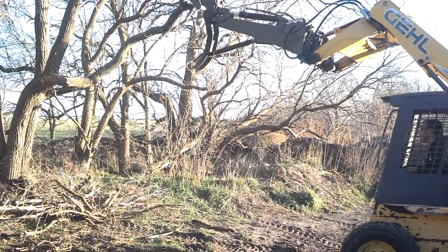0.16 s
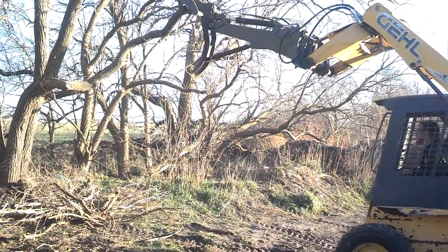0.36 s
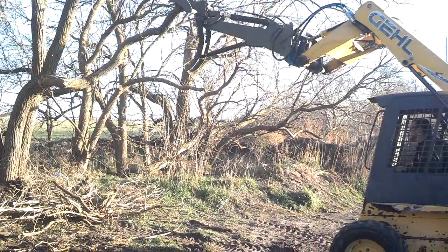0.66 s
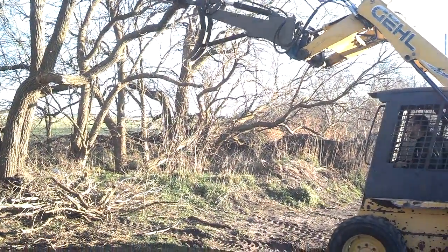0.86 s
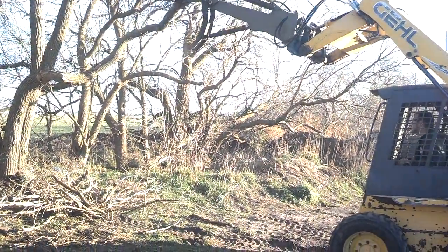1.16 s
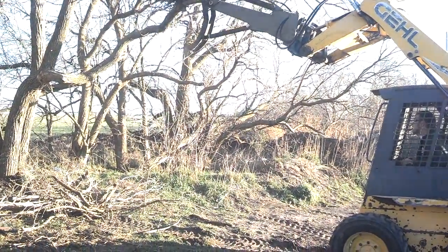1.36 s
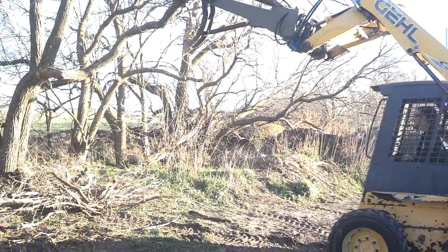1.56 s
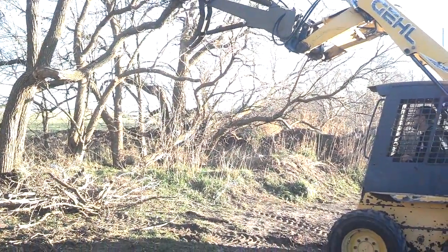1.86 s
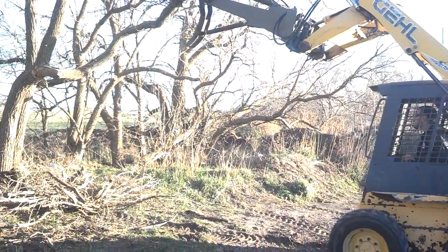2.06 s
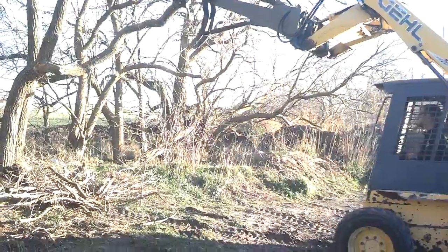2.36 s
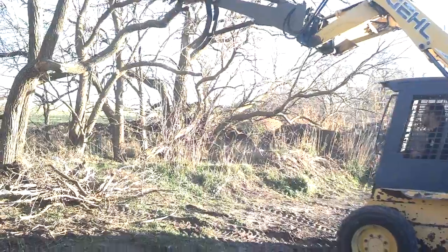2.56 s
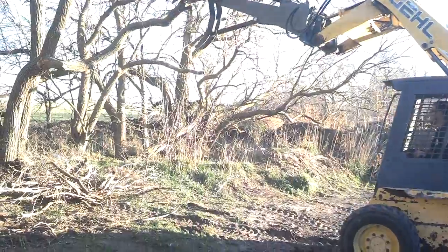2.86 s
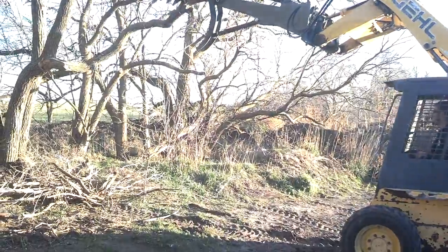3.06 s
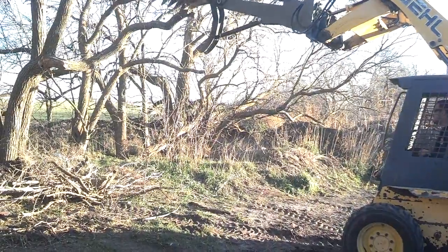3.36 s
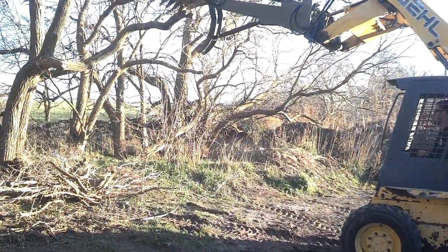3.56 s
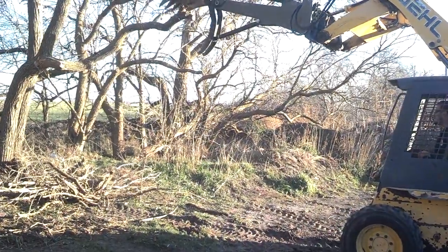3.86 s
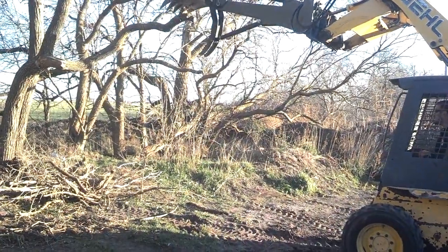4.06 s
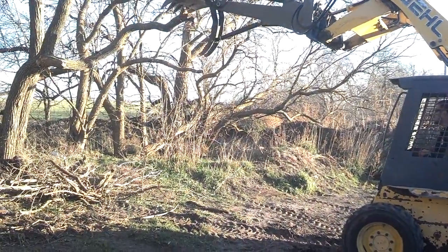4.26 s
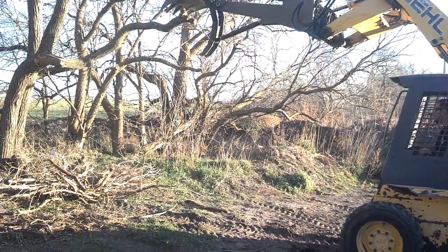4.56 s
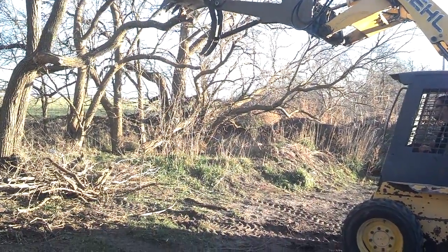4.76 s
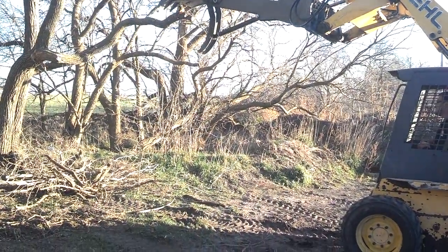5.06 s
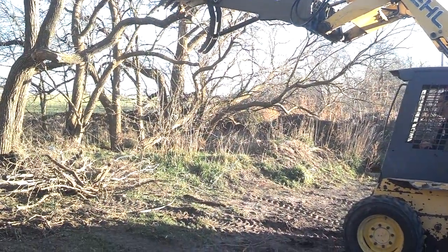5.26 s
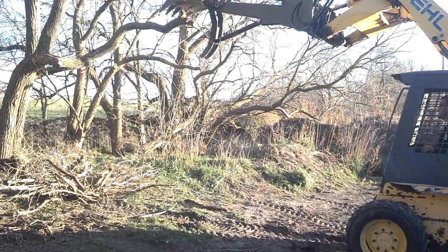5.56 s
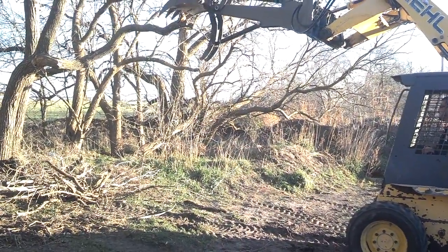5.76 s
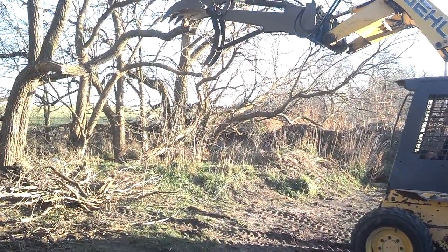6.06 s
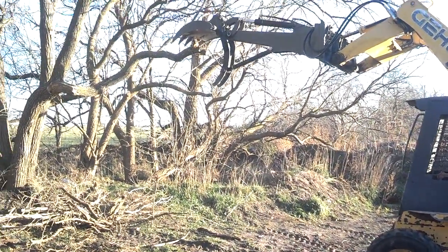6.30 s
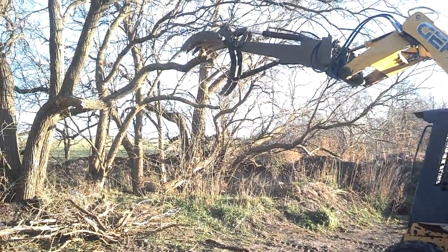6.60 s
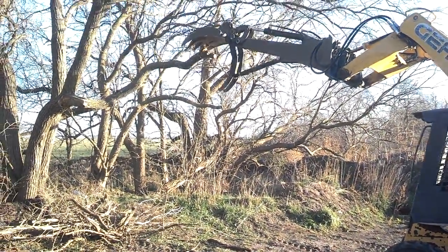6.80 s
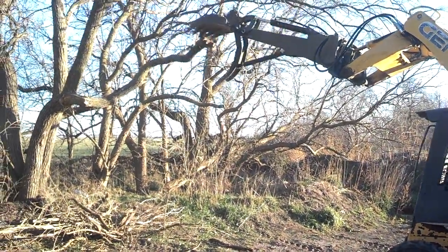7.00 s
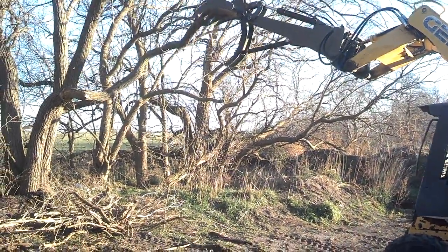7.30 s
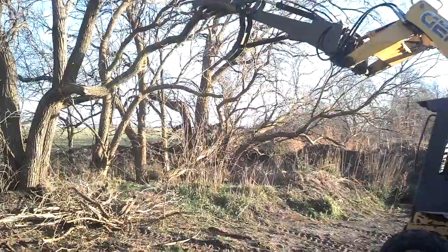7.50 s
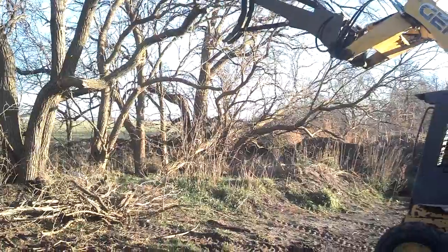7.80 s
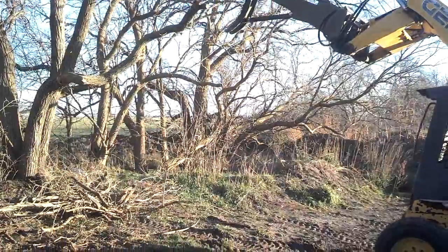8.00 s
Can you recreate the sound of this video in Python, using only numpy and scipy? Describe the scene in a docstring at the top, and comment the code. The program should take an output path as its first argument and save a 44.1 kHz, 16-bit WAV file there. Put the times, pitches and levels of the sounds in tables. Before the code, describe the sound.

A steady, rattly diesel engine with fan rush and valve ticking fills a nearby open-air stereo pickup, wind thumping low on the microphone. Early pump whine and metal knocks lead to clusters of sharp branch snaps, each splintering and stuttering, with fine twig crackle between. The engine dips under the loudest cracks and slowly recovers; a late clatter of steel and a rising whine close it.

```python
"""A diesel loader runs from start to end as firing tones, rushing noise and ringing panels, with wind beside it.
The wind is a low rumble with puffs of a few swings; pump whines geared to the engine soon come and go.
From 0.7 s steel pins knock as decaying modes; from 1.1 s dead brush snaps as bursts of noise, with twigs crackling.
A two-port microphone forms left and right by subtracting each port, delayed, from the other."""
import sys
import numpy as np
from scipy import signal
from scipy.fft import rfft, irfft
from scipy.io import wavfile
from scipy.ndimage import uniform_filter1d, map_coordinates

SR = 44100
rng = np.random.default_rng(int(sys.argv[2]) if len(sys.argv) > 2 else 0)


def inscribe(sig):
    """Save sig as 16-bit PCM at rate SR to the path in sys.argv[1].

    A 1-D sig is mono; a 2-D sig holds one channel per row.
    Samples are clipped to [-1, 1] before scaling.
    """
    pcm = np.round(np.clip(np.atleast_2d(sig).T, -1, 1) * 32767)
    wavfile.write(sys.argv[1], SR, pcm.astype(np.int16))


N = 358974
T = np.arange(N) / SR  # time of each sample in seconds


def gain_of(db):
    """Turns decibels into a plain multiplier."""
    return 10 ** (np.asarray(db) / 20)


def evened(x):
    """Scales x to an rms of 1."""
    return x / np.sqrt(np.mean(x ** 2) + 1e-20)


def curve(rows):
    """Joins (seconds, value) rows by straight lines over the whole scene."""
    times, values = np.transpose(rows)
    return np.interp(T, times, values)


def read(points, hz, column=1):
    """Reads a table column at any pitch, joining its points along a logarithmic pitch scale."""
    points = np.transpose(points)
    return np.interp(np.log(hz + 1), np.log(points[0] + 1), points[column])


def colour(x, points):
    """Weights the spectrum of x by a table of (Hz, dB)."""
    hz = np.fft.rfftfreq(len(x), 1 / SR)
    return irfft(rfft(x) * gain_of(read(points, hz)), len(x))


def drift(per_s):
    """Smooth random wandering of rms 1, with so many random points a second."""
    knots = np.arange(-2, N / SR * per_s + 3)
    return evened(map_coordinates(rng.standard_normal(len(knots)), [T * per_s + 2], order=3))


def ring(x, hz, width_hz):
    """One resonance with a gain of 1 at its peak."""
    return signal.lfilter(*signal.iirpeak(hz, hz / width_hz, SR), x)


def add(mix, start_s, sound):
    """Mixes a sound in at its start time, cut off at the end of the scene."""
    part = mix[round(start_s * SR):][:len(sound)]
    part += sound[:len(part)]


def span(start, end, edge_s):
    """1 between start and end, with soft edges."""
    return np.clip(np.minimum(T - start, end - T) / edge_s, 0, 1)


# Moments when engine and wind drop in level. Each row: time in seconds, depth in dB.
LEVEL_STEPS = [(.85, 3), (1.794, 5.5), (2.05, 4.5), (2.59, 13), (3.16, 11), (3.41, 13), (3.98, 13.5),
               (4.475, 13.5), (4.91, 10), (7.12, 4)]
CREEP_DB_PER_S, HOLD_S = 7, 0.59  # slow return at first, for this long
EXTRA_RETURN_DB_PER_S = 5  # added to the creep after the hold
SWELL_DB, SWELL_S = 4, 0.056  # the sound also swells up at the very start


def dip_db():
    """How far engine and wind are held below full level: quick drops that recover slowly, then faster."""
    times, depths = np.transpose(LEVEL_STEPS)[:, :, None]
    since = T - times
    late = np.maximum(since - HOLD_S, 0)
    left = depths - CREEP_DB_PER_S * since - EXTRA_RETURN_DB_PER_S * late
    deepest = np.maximum(left * (since > 0), 0).max(0)
    return uniform_filter1d(deepest, size=900) + SWELL_DB * np.exp(-T / SWELL_S)


# How fast the crankshaft spins. Each row: time in seconds, speed in turns a second.
CRANK_SPEED = [(0.0, 29.96), (0.55, 29.7), (0.9, 28.94), (1.1, 29.26), (1.33, 29.05), (1.65, 30.0),
               (1.95, 29.75), (2.3, 29.7), (2.6, 29.2), (2.9, 30.2), (3.08, 29.9), (3.32, 28.9),
               (3.7, 30.2), (4.1, 29.25), (4.33, 29.8), (4.65, 29.25), (4.9, 30.0), (6.5, 29.98),
               (6.75, 29.15), (6.92, 29.1), (7.1, 28.7), (7.48, 29.55), (7.9, 28.7), (8.14, 29.3)]


def crank_turns():
    """Turns made by the crankshaft: its speed added up over time."""
    return np.cumsum(curve(CRANK_SPEED)) / SR


# Exhaust tones. Each row: multiple of the crankshaft speed, level in dB against the other engine tones,
# dB gained for each turn a second that load pulls the speed down.
EXHAUST_TONES = [(2.0, -31.5, 0), (2.5, -52, -2), (4.0, -12.5, -0.5), (4.5, -66, 2), (5.5, -26, -7),
                 (6.0, -22, 7.5), (6.5, -28.5, 2), (7.0, -31, -3), (7.5, -43, 4), (8.0, -33, -10.5),
                 (8.5, -37.5, -14), (9.0, -40.5, -4), (9.5, -36.5, 6.5), (10.0, -32, 3.5), (10.5, -55, 10),
                 (11.0, -32.5, -6), (11.5, -36, 1), (12.0, -30, -6.5), (12.5, -33.5, 5), (13.0, -36, 1.5),
                 (14.0, -55, 5), (15.0, -53, 4), (16.0, -59, -1), (16.5, -42.5, -2), (17.0, -40, 3),
                 (17.5, -46, 4), (18.0, -40.5, -1.5), (18.5, -41.5, 4), (19.0, -42, -3), (19.5, -68, -7),
                 (20.0, -39, -4)]
# Where groups of tones peak in the cycle. Each row: highest multiple in the group, lateness in turns.
CHUG_LAG = [(7, 0), (10, 1.3), (15, .55), (20, 1.35)]


def exhaust_tones(turns, sag):
    """Tones locked to the crankshaft; each group peaks together, so the exhaust chugs once in two turns."""
    tones = np.zeros(N)
    for multiple, db, load_db in EXHAUST_TONES:
        late = next(lag for top, lag in CHUG_LAG if multiple <= top)
        # higher tones wander more, in strength and in phase
        strength_db = db + load_db * sag + 2.6 * (multiple > 4) * drift(8)
        cycles = multiple * (turns - late) + .003 * multiple * drift(5)
        tones += gain_of(strength_db) * np.cos(2 * np.pi * cycles)
    return tones


# Thin tones of gears and valves. Each row: multiple of the crankshaft speed, level in dB against the other
# engine tones, dB gained for each turn a second that load pulls the speed down.
GEAR_TONES = [(21.2, -42.5, -1), (24, -56, -9), (23.9, -56, -9), (26, -45.5, -23), (27, -46, -4),
              (37.8, -52, 2), (38.15, -46, -4), (40.6, -47.5, -15), (47.1, -46, -11), (49.7, -46.5, 1.5),
              (54.3, -45, -4), (60.8, -78, -17)]


def gear_tones(turns, sag):
    """Thin, slightly wavering tones geared to the crankshaft, each with its own random phase."""
    tones = np.zeros(N)
    for multiple, db, load_db in GEAR_TONES:
        strength_db = db + load_db * sag + 2.5 * drift(3)
        cycles = multiple * turns + .04 * drift(5) + rng.random()
        tones += gain_of(strength_db) * np.cos(2 * np.pi * cycles)
    return tones


# Colour of the valve gear's ticks. Each row: pitch in Hz, relative level in dB.
TAPPET_COLOUR = [(800, -30), (1800, -9), (4000, 4), (7000, -1), (12000, -26), (16000, 9.5)]
TAPPET_T60_S = 0.017  # time to fade by 60 dB


def tappets(firings):
    """Valve gear ticks at each firing: short fading noise, uneven in time and strength."""
    ticks = np.diff(np.floor(firings + .02 * drift(30)), prepend=0) * gain_of(4 * drift(60))
    fades = signal.oaconvolve(ticks, gain_of(-60 * T[:2000] / TAPPET_T60_S))[:N]
    return evened(colour(fades * rng.standard_normal(N), TAPPET_COLOUR))


# Rushing of fan, intake and block. Each row: pitch in Hz, relative level in dB per Hz.
RUSH_COLOUR = [(30, -49), (60, -44), (120, -38), (250, -40), (430, -52), (600, -53), (1000, -58),
               (1500, -67.5), (2000, -67), (2800, -64), (4100, -70), (6500, -74.5), (8500, -85.5),
               (9800, -85), (11000, -99.5), (13000, -76), (15600, -83)]
# Panels and castings that ring with the clatter. Each row: pitch in Hz, width in Hz, relative level in dB.
PANELS = [(819, 24, 3), (1150, 72, -3.5), (1501, 50, 3.5), (1622, 75, 0), (2300, 160, -7), (4036, 100, -3)]
# Strength of each of the four firings in turn, in dB.
CYLINDER_DB = [-0.5, -12, 1.5, -11.5]
START_TURNS = .88  # where the crankshaft stands at the start
REPEAT_SHARE = .55  # part of the clatter that returns alike every two turns
REPEAT_SLIP_TURNS = .003  # typical slip of that repeat
ENGINE_DB = -33.5  # overall engine level


def engine():
    """Tones, ticks, rushing that throbs and panels struck by each of four firings in two turns.
    The second row is the part of the rushing that arrives scattered, unlike at the two ports."""
    turns = START_TURNS + crank_turns()
    sag = 29.7 - curve(CRANK_SPEED)  # load pulls the speed down
    tones = exhaust_tones(turns, sag) + gear_tones(turns, sag)

    firings = 2 * turns
    strength = gain_of(np.take(CYLINDER_DB, firings.astype(int) % 4))
    pulses = uniform_filter1d(strength * np.exp(-(firings % 1) / 0.5), size=60)
    throb = (2.8 + pulses) * gain_of(.7 * drift(12))
    fresh, scattered = throb * rng.standard_normal((2, N))

    # one stored stretch of noise is read again on every two turns
    cycle = rng.standard_normal(3000)
    place = (turns + REPEAT_SLIP_TURNS * drift(20)) / 2 % 1
    repeated = throb * cycle[(place * len(cycle)).astype(int)]
    drive = np.sqrt(1 - REPEAT_SHARE ** 2) * fresh + REPEAT_SHARE * repeated
    rush = evened(colour(drive, RUSH_COLOUR))

    blows = strength * np.diff(np.floor(firings), prepend=0) * gain_of(2 * drift(47))
    struck = evened(drive) + 0.33 * evened(blows)
    panels = evened(sum(gain_of(db) * evened(ring(struck, hz, width)) for hz, width, db in PANELS))

    direct = gain_of(31.5) * tones + gain_of(11.5) * rush
    direct += gain_of(-8) * panels + gain_of(-10) * tappets(firings)
    scattered_rush = gain_of(7.5) * evened(colour(scattered, RUSH_COLOUR))
    return gain_of(ENGINE_DB - dip_db()) * np.array([direct, scattered_rush])


# Strength of the wind. Each row: time in seconds, rumble level in dB before the dips.
GUST = [(0, -27), (.25, -28), (.55, -37), (.85, -24), (1.1, -29), (1.4, -32), (1.6, -36), (2.0, -31),
        (2.7, -31), (3.0, -26), (3.3, -30), (4.35, -34), (4.8, -23), (5.2, -33), (6.2, -34), (6.6, -36),
        (7.4, -33), (8.14, -40)]
# Colour of the rumble. Each row: pitch in Hz, relative level in dB per Hz.
RUMBLE_COLOUR = [(20, -31), (45, -20), (110, 2.5), (200, -11), (330, -21), (600, -18.5), (1200, -52)]
# Puffs at set times. Each row: time of the middle in seconds, peak level in dB.
SET_PUFFS = [(.073, -21), (.096, -17), (.206, -16), (.263, -24), (.514, -19), (.841, -7), (.86, -9),
             (.898, -10), (.935, -11), (.956, -14), (1.285, -11), (1.44, -15), (1.73, -11), (1.758, -9),
             (1.795, -9), (2.043, -8), (2.937, -15), (3.003, -17), (3.06, -15), (4.623, -28), (4.661, -21),
             (4.863, -17), (5.14, -20), (5.172, -21), (5.398, -14), (5.538, -15), (5.785, -14),
             (5.861, -14), (5.933, -17), (6.225, -19), (7.449, -16)]
PUFF_HZ, PUFF_SPREAD = 158, 0.31  # middle pitch, and the share by which it varies either way
RANDOM_PUFFS_PER_S, RANDOM_PUFF_DB = 9, 13.5  # further puffs fall at random, about this far above the rumble


def wind():
    """Lumpy low noise, and puffs of two or three low swings that slow down as they pass."""
    rumble_db = curve(GUST) - dip_db()
    noise = evened(colour(rng.standard_normal(N), RUMBLE_COLOUR))
    out = gain_of(rumble_db + 1.7 * drift(28)) * noise

    at = 1300 + np.flatnonzero(rng.random(N - 1300) < RANDOM_PUFFS_PER_S / SR)
    random_db = rumble_db[at] + RANDOM_PUFF_DB + 2.1 * rng.standard_normal(len(at))
    random_puffs = np.transpose([T[at], random_db])

    t = T[:2600] - T[1300]  # seconds from the middle of a puff
    for middle_s, db in [*SET_PUFFS, *random_puffs]:
        pitch, phase = rng.random(2)
        hz = PUFF_HZ * (1 + PUFF_SPREAD * (2 * pitch - 1))
        swing = np.cos(2 * np.pi * (hz * t - 900 * t ** 2 + phase))
        swell = np.exp(-(t * hz / 0.47) ** 2)
        add(out, middle_s - T[1300], gain_of(db) * swell * swing)
    return out


# Whines of the two pumps while loaded. Each row: start in seconds, end in seconds,
# multiple of the crankshaft speed, level in dB reached at the end (before the partials' own levels).
DRIVE_PUMP = [(.09, .22, 18, -37), (.17, .86, 18, -23), (.83, .97, 18, -32), (7.25, 7.45, 18, -42),
              (8.02, 8.3, 18, -24)]
LIFT_PUMP = [(.7, 1.03, 26, -31), (1.06, 1.42, 26, -29), (.68, 1.06, 27, -36), (2.33, 2.62, 26, -33.5),
             (3.04, 3.43, 26, -41), (3.86, 4.2, 26, -44.5), (4.2, 4.7, 26, -48), (6.74, 6.97, 26, -34),
             (7.6, 8.05, 30, -45), (7.78, 8.08, 41.5, -42), (7.98, 8.06, 27, -29), (8.04, 8.3, 27, -26)]
LOAD_S = .05  # the pressure comes and goes this fast
FLUTTER_DB, FLUTTER_PER_S = 2, 35  # pressure ripple roughens the whine


def pump_whine(stretches, partials, build_db):
    """A slightly unsteady tone, geared to the crankshaft, that sounds only while the pump is loaded."""
    out, crank = np.zeros(N), crank_turns()
    for start, end, multiple, level_db in stretches:
        turns = multiple * crank + 0.0062 * drift(4.2)
        tone = sum(gain_of(db) * np.sin(2 * np.pi * k * turns) for k, db in partials)
        # pressure builds through the stretch
        rise_db = build_db * np.clip((T - end) / (end - start), -1, 0)
        unsteady_db = 0.4 * drift(6.9) + FLUTTER_DB * drift(FLUTTER_PER_S)
        out += span(start, end, LOAD_S) * gain_of(level_db + rise_db + unsteady_db) * tone
    return out


def pumps():
    """Both pumps; each partial is given as its multiple of the whine's pitch and its level in dB."""
    driving = pump_whine(DRIVE_PUMP, [(1, 2.5), (2, -26)], build_db=6.5)
    lifting = pump_whine(LIFT_PUMP, [(.5, -0.21), (1, -0.15)], build_db=1.5)
    return driving + lifting


# Steel on steel. Each row: start in seconds, peak level in dB, pitch in Hz around which the struck spot
# rings most, share of the free ring time.
KNOCKS = [(.675, -15, 1200, 0.71), (.682, -19, 1500, .6), (0.695, -27, 1398, .5), (1.004, -22.5, 2200, .6),
          (1.008, -33, 696, 0.45), (1.055, -13.5, 614, .2), (1.096, -21, 1000, 0.6), (3.5, -27, 1500, .5),
          (3.521, -26, 1520, 0.65), (7.093, -21, 1150, 0.6), (7.101, -24, 1250, .5),
          (7.108, -15, 1080, 0.46), (7.11, -18, 756, 1.5), (7.113, -18, 2360, 1.1), (7.115, -20, 1500, .9),
          (7.129, -19, 800, 0.73), (7.158, -17.5, 740, .4), (7.243, -24, 1200, 0.37),
          (7.248, -24, 1720, .5), (7.272, -26, 1150, 0.36)]
# Ringing modes of the arm. Each row: pitch in Hz, relative level in dB, seconds to fade by 60 dB when free.
STEEL_MODES = [(534, -6, 0.14), (756, 4, 0.16), (810, -18, 0.12), (1030, -24, 0.28), (1090, -8.5, 0.1),
               (1280, -3, 0.15), (1410, -18, 0.055), (1500, -17, 0.26), (1600, -7, 0.19), (1700, -10, 0.11),
               (2080, -10, 0.087), (2480, -4, 0.17), (3270, -4, 0.11)]
CLACK_DB, CLACK_T60_S, CLACK_DB_PER_OCTAVE = -4, .04, 8  # dull, wide start; the slope grows as octaves squared
RATTLE_DB = 3  # loose pins chatter through the ring


def linkage():
    """Slack pins knock: a dull clack, then the same arm rings, most strongly near the struck spot's pitch."""
    out, t = np.zeros(N), T[:12000]
    for start_s, db, spot_hz, free in KNOCKS:
        tone = np.zeros(len(t))
        for hz, mode_db, t60 in STEEL_MODES:
            octaves_away = abs(np.log2(hz / spot_hz))
            fade = gain_of(mode_db - 12 * octaves_away - 60 * t / (free * t60))
            tone += fade * np.sin(2 * np.pi * (hz * t + rng.random()))
        chatter, noise = rng.standard_normal((2, len(t)))
        tone *= gain_of(RATTLE_DB * evened(uniform_filter1d(chatter, size=150)))

        spot = [(spot_hz * 2. ** k, -CLACK_DB_PER_OCTAVE * k ** 2) for k in (-3, -2, -1, 0, 1, 2, 3)]
        clack = colour(noise, spot) * gain_of(-60 * t / CLACK_T60_S)
        blow = tone / abs(tone).max() + gain_of(CLACK_DB) * clack / abs(clack).max()
        attack = np.minimum(t / 0.0018, 1)
        add(out, start_s, gain_of(db) * blow / abs(blow).max() * attack)
    return out


# Branches snapping. Each row: start in seconds, level of the main part in dB, then against that level the treble
# in dB, the knock in dB and the splintering in dB (before the trim below), its fade by 60 dB in seconds.
SNAPS = [(1.094, -27.5, 0, -6, 11, 0.19), (1.3195, -25, 2, -15, -22, .08), (1.7227, -40, -12, -13, -11, .1),
         (2.4282, -20, -11, 7.5, -6, .1), (2.4418, -32, -4, -5, 15.5, 0.11),
         (2.528, -28, 13, -12, -11, .08), (2.547, -37, 10, -13, -7, .06), (2.559, -17, -16, -26, -14, .06),
         (2.577, -20, -8, -22, 2, 0.078), (2.588, -5.5, -32, -9.5, -15.5, 0.12),
         (2.605, -21.5, -8, -10, 1, 0.088), (2.746, -24.5, -7, -17, -2, 0.12),
         (2.8289, -27.5, -9, -10, -2, 0.11), (3.1193, -33.5, 12.5, -16, -7, 0.082),
         (3.158, -13, -14, -13, -5.5, 0.12), (3.198, -32, 1, -19, -8, 0.073),
         (3.2009, -20.5, 2, -19, 2.5, 0.14), (3.237, -30, 9, -22, -6, 0.038),
         (3.268, -35, 12, -16, -1, .06), (3.278, -19, 3, -15, 1, 0.17), (3.3023, -22, 7, 0.5, -7, 0.055),
         (3.331, -27.5, -4, -13, 8, 0.11), (3.374, -22, -2.5, -16, -6, 0.083),
         (3.41, -13.5, -14, -20, 0.5, 0.092), (3.4454, -30, -7, -9, 8, 0.21),
         (3.476, -25.5, -9, 9, -12, 0.12), (3.93, -27.5, 2, -13, -17, 0.065), (3.973, -23, 6, -14, -8, .06),
         (3.979, -12, -6, -7.5, -10, 0.19), (4.0131, -17, 3, -12, -11.5, 0.11),
         (4.0716, -31, 5, -12, -13, 0.07), (4.1253, -35.5, 8, -11, 2, 0.18),
         (4.455, -34, 8, -16, -6, 0.075), (4.465, -32, 6, -16, -12, .05), (4.4745, -15, 0, -20, -8, 0.09),
         (4.483, -24, -6, 2, -6, 0.06), (4.629, -31, 2, -13, -7, .06), (4.7327, -35, -8, -15, -4, .06),
         (4.7764, -37, 13, -13, -19, .06), (4.8354, -25, 3, -18, -14, .07),
         (4.9089, -20, 0, -21, -11, 0.063), (4.938, -27, -2, -14, -4, 0.08),
         (5.0358, -23, 2, -18, -14, 0.08), (5.122, -41.5, 20, -13, -10, .06),
         (5.165, -36, 10, -13.5, -11, .05), (5.2467, -31, -1, -13, -2, .08),
         (5.391, -22.5, -10, 1, -5, 0.11), (5.6107, -25, -19, 3, -4, 0.13),
         (5.6856, -23, -2, -11, -5, 0.086), (5.975, -35, 13, -12, -12, .05), (6.034, -33, 15, -13, -8, .05),
         (6.049, -27, 10.5, -13, -2, 0.071), (6.3418, -19, 2.5, -12, -11, 0.087),
         (7.114, -29, 4.5, 5, 6, 0.5), (7.1625, -26, 1, -13, 0, 0.092)]
# Repeats of the tick at fixed delays after each snap. Each row: delay in seconds, level in dB against the
# splintering, which counts as -7 dB at most.
STUTTER = [(.0043, 5), (.0088, 3), (.0128, 0), (.019, -4)]
BREAK_DB = 8  # the first break of the fibres against the tick's noise
GRAIN_DB = 4  # each branch has its own uneven colour
SNAP_DRY_DB = 5  # the hiss of splinters is turned down this much
TREBLE_T60_SHARE = .55  # treble dies sooner than the rest
# bands of a snap: (Hz, dB)
MAIN_BAND = [(300, -26), (900, -1.0), (2200, -4.0), (2800, 0.5), (5200, -1.5), (7000, -14.5), (16000, -25.5)]
TREBLE_BAND = [(4500, -14), (6500, -5.0), (9000, -5.5), (11000, -33), (15500, 0)]
KNOCK_BAND = [(250, -32), (500, -7.0), (800, -1.0), (1600, -4.0), (2300, -16.5)]


def snaps():
    """Each snap is a sharp tick heard again a few times within milliseconds, splintering noise, and a duller
    knock."""
    out, t = np.zeros(N), T[:8192]
    tick = gain_of(-60 * t / .006) * np.minimum(t / .0006, 1)
    first_break = gain_of(BREAK_DB) * (t == T[20])
    for start_s, db, treble_db, knock_db, splinter_db, t60 in SNAPS:
        noise, grains = rng.standard_normal((2, len(t)))
        branch = np.transpose([np.geomspace(500, 16000, 30), GRAIN_DB * rng.standard_normal(30)])
        branch_noise = colour(noise, branch)
        fibres = gain_of(4.5 * evened(uniform_filter1d(grains, size=60)))  # splinters part unevenly
        # level in dB, share of the fade time, trim of the tick in dB, band
        parts = [(0, 1, 0, MAIN_BAND),
                 (treble_db, TREBLE_T60_SHARE, 0, TREBLE_BAND),
                 (knock_db, 1.2, -5, KNOCK_BAND)]
        for part_db, share, tick_db, band in parts:
            sharp = colour(tick * noise + first_break, band)
            sharp = sharp / abs(sharp).max()
            again = np.zeros(len(t))
            for later_s, more_db in STUTTER:
                again_db = min(splinter_db, -7) + more_db
                again += gain_of(again_db) * np.roll(sharp, round(later_s * SR))
            fade = gain_of(-60 * t / (share * t60)) * np.minimum(t / .003, 1)
            hiss = colour(branch_noise, band) * fibres * fade
            hiss = gain_of(splinter_db - SNAP_DRY_DB) * hiss / abs(hiss).max()
            add(out, start_s, gain_of(db + part_db) * (gain_of(tick_db) * sharp + again + hiss))
    return out


# Stretches of small crackle. Each row: start in seconds, end in seconds, level in dB.
TWIGS = [(2.373, 2.692, -41), (3.128, 3.52, -43.5), (3.935, 4.097, -44.5), (4.425, 6.4, -49)]
# Colour of the crackling wood. Each row: pitch in Hz, relative level in dB.
WOOD_COLOUR = [(300, -29), (1000, 0.5), (2500, -5), (4500, -2.5), (7000, -7), (10000, -16.5), (15500, -7)]


def twigs():
    """Twigs crackle: many small random ticks, each with a short tail of noise."""
    strengths = gain_of(4.1 * np.minimum(rng.exponential(1, N), 4))
    ticks = strengths * (rng.random(N) < 350 / SR)  # about 350 a second
    fades = signal.oaconvolve(ticks, gain_of(-60 * T[:2000] / 0.072))[:N]
    crackle = evened(colour(fades * rng.standard_normal(N), WOOD_COLOUR))
    return sum(gain_of(db) * span(start, end, 0.02) for start, end, db in TWIGS) * crackle


# Port difference against port sum. Each row: pitch in Hz, level in dB (before a 1 dB trim), phase in radians.
ACROSS = [(30, -22, -.4), (60, -13, -.4), (120, -15, -.45), (250, -15, -.5), (350, -14.5, -.4),
          (430, -13, 1), (600, -8, -.2), (1000, -7, -.9), (1600, -2, -1.2), (2100, -4, -.9), (2800, 4, -.3),
          (3500, -1, -.2), (6000, 0, 0), (8400, 3, 0), (11000, 1, 0)]


def scene():
    """The two ports: sound from one side differs little between them in the bass, wind pushes them oppositely."""
    total, scattered = engine()
    gusts = wind()
    total = total + pumps() + linkage() + snaps() + twigs()
    hz = np.fft.rfftfreq(N, 1 / SR)
    across = gain_of(read(ACROSS, hz)) * np.exp(1j * read(ACROSS, hz, column=2))
    apart = irfft(rfft(gain_of(-1) * total + scattered) * across, N) + gusts
    return np.array([total + apart, total - apart])


PORT_DELAY = 16  # samples
EDGE_HZ = 15850  # upper limit of the band


def record(dry):
    """Each channel is half of one port minus the delayed other; then the band limit."""
    late = np.pad(dry[::-1], ((0, 0), (PORT_DELAY, 0)))[:, :N]
    pair = (dry - late) / 2
    low_pass = signal.firwin(511, EDGE_HZ, window=("kaiser", 9), fs=SR)
    return signal.oaconvolve(pair, low_pass[None], "same")


dry = scene()
out = record(dry)
inscribe(out)
```